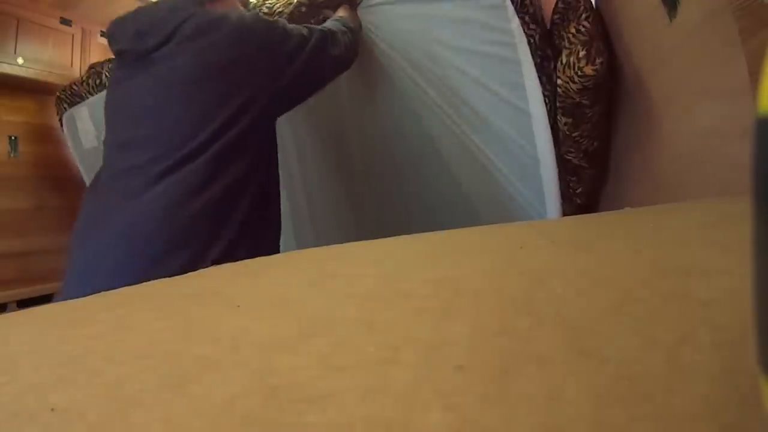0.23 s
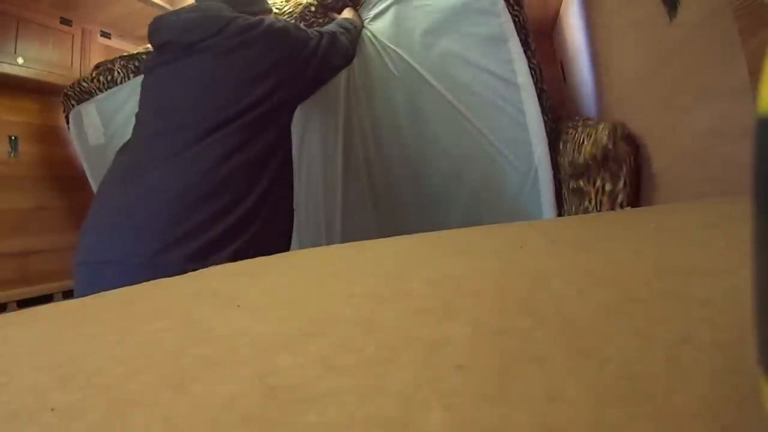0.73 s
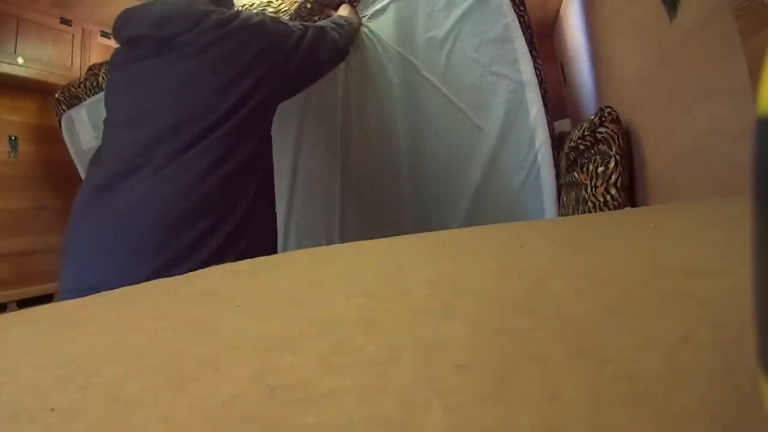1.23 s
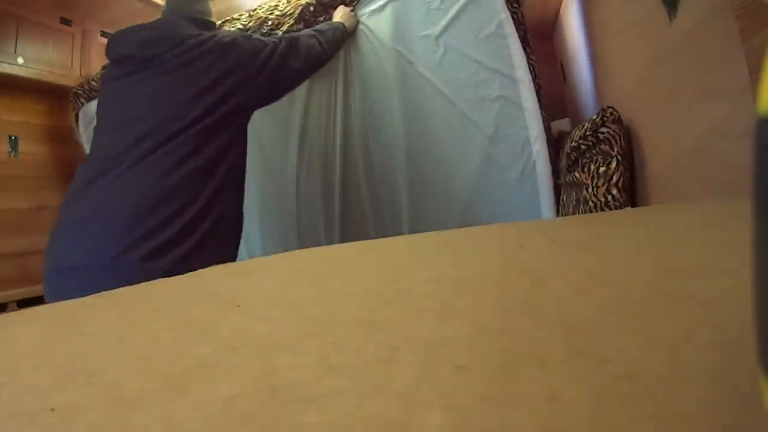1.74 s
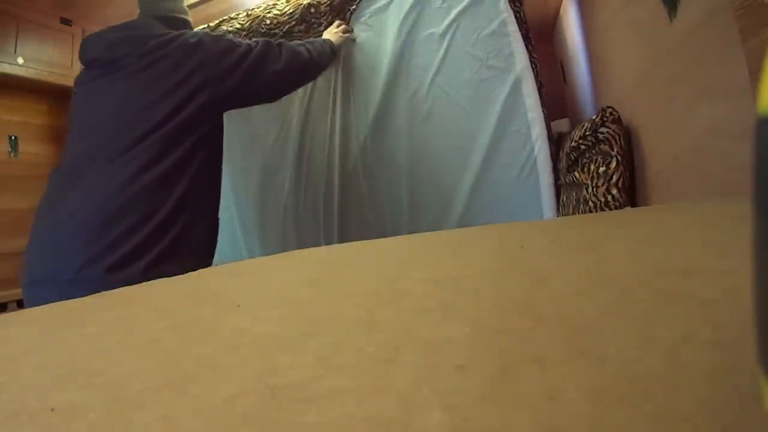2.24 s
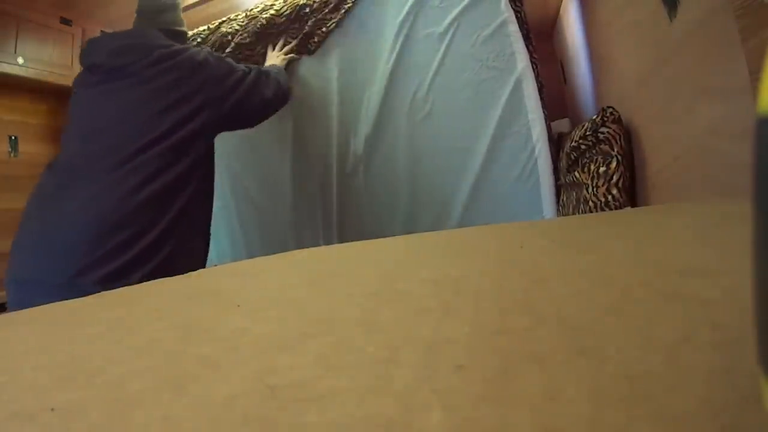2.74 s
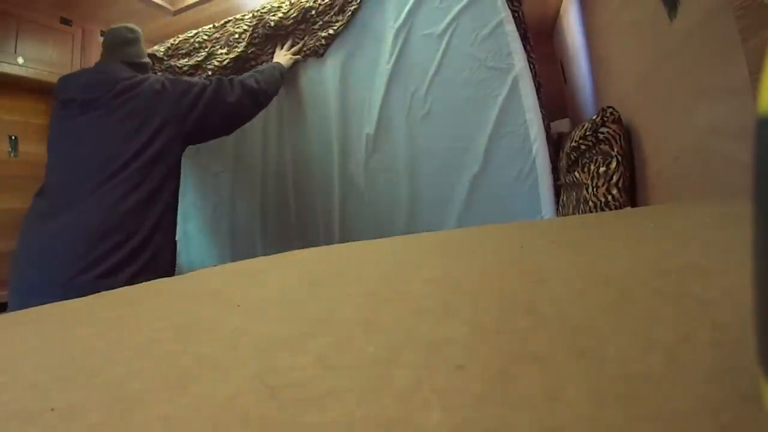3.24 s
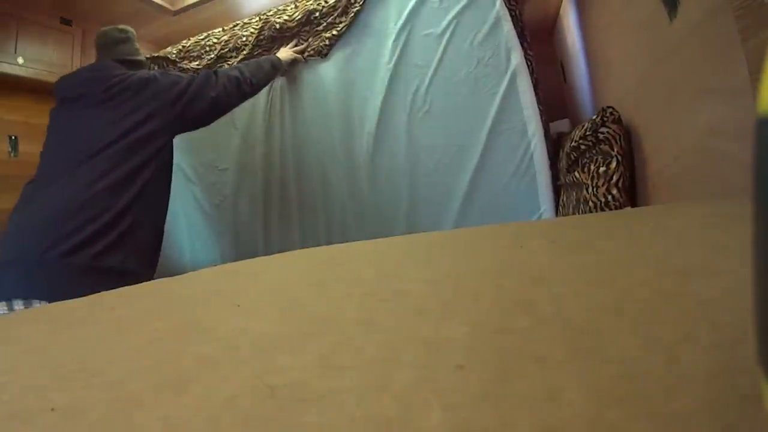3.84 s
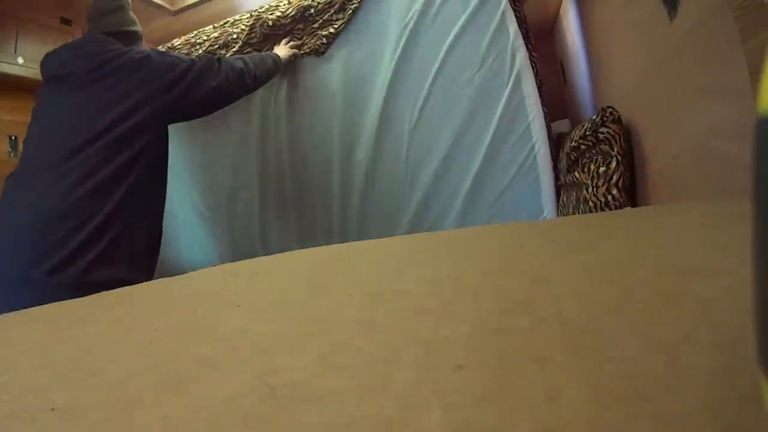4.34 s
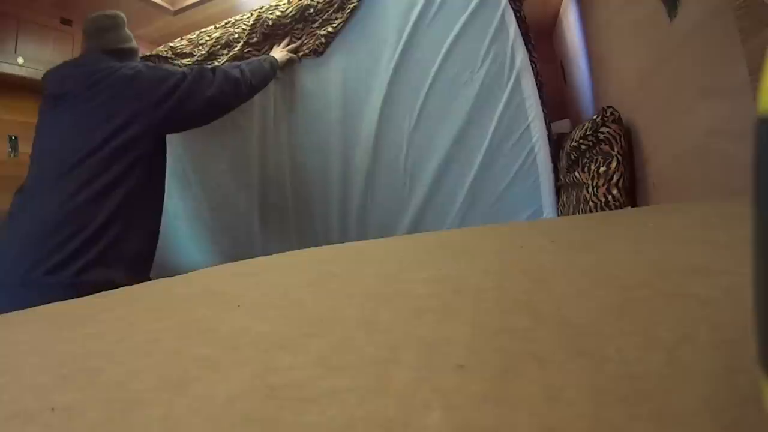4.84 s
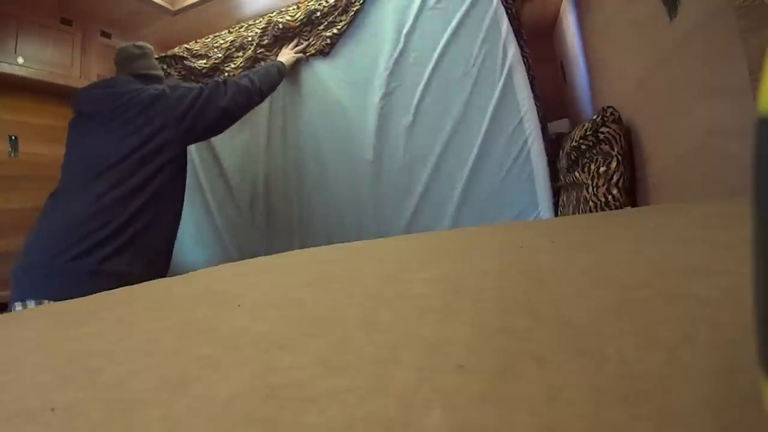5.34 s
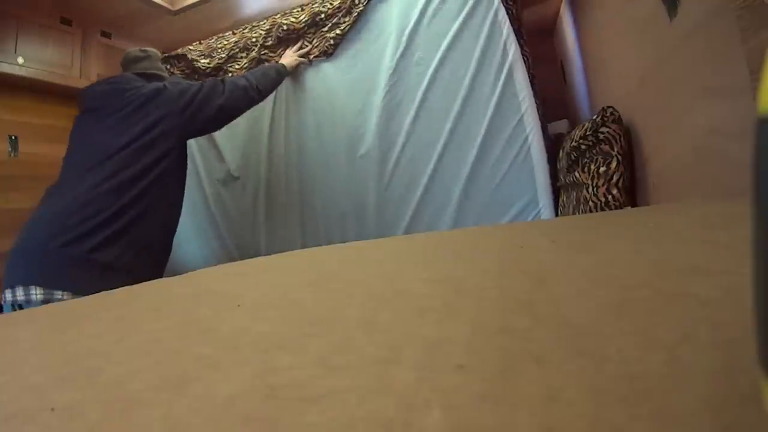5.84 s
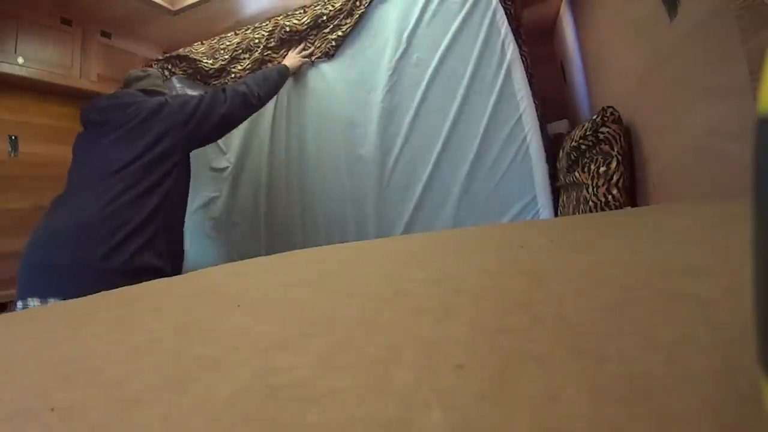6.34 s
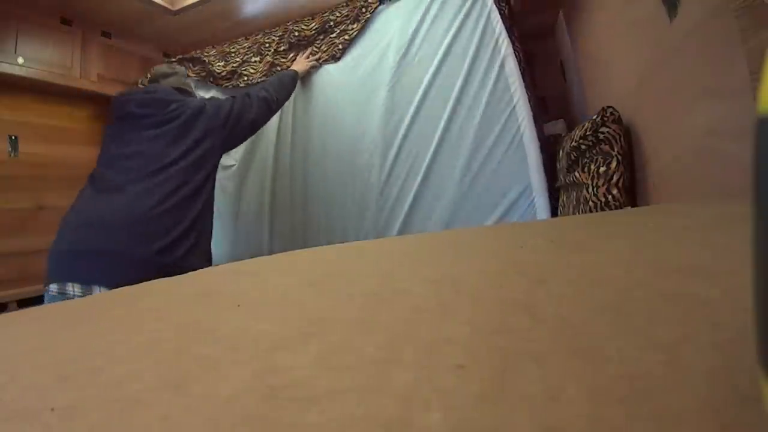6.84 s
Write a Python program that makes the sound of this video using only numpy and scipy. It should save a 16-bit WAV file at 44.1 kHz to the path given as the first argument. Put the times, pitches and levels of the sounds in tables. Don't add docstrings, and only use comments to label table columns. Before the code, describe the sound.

A furnace blower rushes and hums steadily in a small cabin while a sheet is tugged over a mattress, with snaps, thumps and a wooden knock.

```python
import sys
import numpy as np
from scipy import signal
from scipy.fft import rfft, irfft
from scipy.io import wavfile
from scipy.ndimage import uniform_filter1d

SR = 44100
rng = np.random.default_rng(int(sys.argv[2]) if len(sys.argv) > 2 else 0)


def inscribe(sig):
    pcm = np.round(np.clip(np.atleast_2d(sig).T, -1, 1) * 32767)
    wavfile.write(sys.argv[1], SR, pcm.astype(np.int16))


def elevation(decibels):
    levels = np.asarray(decibels, float)
    return 10 ** (levels / 20)


N = 312228


def evened(x):
    return x / np.sqrt(np.mean(x ** 2) + 1e-20)


def read(points, hz):
    f, value = np.transpose(points)
    return np.interp(np.log(hz + 1), np.log(f + 1), value)


def add(mix, start_s, sound):
    part = mix[..., round(start_s * SR):][..., :sound.shape[-1]]
    part += sound[..., :part.shape[-1]]


def drift(rate_hz):
    z = rfft(rng.standard_normal(N))
    hz = np.arange(len(z)) * SR / N
    return evened(irfft(z / (1 + (hz / rate_hz) ** 2), N))


def noise(colour_db, size, patchy_db):
    frames = 4 * N // size + 6
    *parts, patches = rng.standard_normal((frames, size // 2 + 1, 5)).T
    patches = uniform_filter1d(patches, size=size // 100, axis=0)
    patches = evened(uniform_filter1d(patches, size=8, axis=1))
    z = np.array(parts[:2]) + 1j * np.array(parts[2:])
    hz = np.fft.rfftfreq(size, 1 / SR)
    z = z * elevation(colour_db(hz)[:, None] + patchy_db * patches)
    sound = signal.istft(z, nperseg=size, noverlap=3 * size // 4)[1]
    return evened(sound[:, :N])


# freq_hz, density_db
RUSH = [(12, -33), (20, -11.5), (120, -7.5), (169, -4.5), (220, -6), (278, 0), (344, -4.5), (582, -8),
        (719, -6.5), (986, -8), (2230, -19), (4910, -29), (10800, -38), (14100, -66.5), (22000, -120)]
# freq_hz, width_hz, lift_db
DUCTS = [(60, 4.2, -1), (89, 68, 3), (179, 45, 7), (283, 29, 1), (309, 7.2, 7), (422, 44, 8),
         (600, 31, 4.5), (660, 56, 7.5), (721, 38, 11), (716, 14, 7), (856, 10, 13), (913, 9.3, 8.5),
         (1130, 21, 6), (1200, 18, 1.5), (1298, 8.2, 8.5), (1590, 21, -3.5), (2270, 32, 6.5)]
# time_s, pitch_hz, level_db
BLADES = [(0, 284.5, -28.5), (.8, 284, -31), (1.05, 286, -24.5), (1.28, 286, -27.5), (1.5, 285.6, -24),
          (2.0, 284.7, -29.5), (2.6, 283, -33), (3.3, 283.3, -28), (3.9, 286, -24.5), (4.4, 284.6, -29),
          (5.35, 284.5, -28), (5.6, 287.5, -25.5), (5.9, 285.5, -22.5), (6.15, 285.3, -28.5),
          (6.75, 285.5, -24.5), (7.08, 285, -27.5)]


def blower():
    def colour_db(hz):
        lifts = sum(elevation(db) ** 2 / (1 + (2 * (hz - f) / width) ** 2) for f, width, db in DUCTS)
        return read(RUSH, hz) + 10 * np.log10(1 + lifts)

    rush = elevation(-23 + 0.5 * drift(5.3)) * noise(colour_db, size=8192, patchy_db=-0.93)
    time_s, pitch_hz, level_db = np.transpose(BLADES)
    t = np.arange(N) / SR
    pass_hz = np.interp(t, time_s, pitch_hz) + 0.9 * drift(5.1)
    phase = 2 * np.pi * np.cumsum(pass_hz) / SR
    flutter_db = 2 * evened(drift(20) - 0.97 * drift(28))
    hum = elevation(np.interp(t, time_s, level_db) - 2.5 + flutter_db) * np.sin(phase)
    wobble = elevation(-44.5 + drift(2.5)) * np.sin(phase / 7)
    return rush + np.sqrt(2) * (hum + wobble) * [[1], [0]]


def effort_db(moves, rest_db):
    t = np.arange(0, N, 64) / SR
    power = elevation(rest_db) ** 2
    for peak_s, rise_s, fall_s, force_db in moves:
        before = (peak_s - t) / max(rise_s, 0.005)
        after = (t - peak_s) / max(fall_s, 0.005)
        away = np.where(t < peak_s, before, after)
        power = power + elevation(force_db - 8.5 * away ** 2.25) ** 2
    return np.interp(np.arange(N) / SR, t, 10 * np.log10(power))


# freq_hz, density_db
HISS = [(800, -23), (2500, -3), (4000, -1.5), (7500, -6.5), (11000, -6.5)]
# freq_hz, density_db
RUB = [(300, -24), (800, 1), (1500, -0.5), (2300, -3), (4000, -12.5), (8000, -39.5)]
# freq_hz, density_db
RUMBLE = [(40, -5.5), (120, -2), (400, 2.5), (800, -2.5), (1500, -11.5), (3000, -32.5)]
# peak_s, rise_s, fall_s, force_db
STROKES = [(.1, 0.1, 1, -38), (.57, 0.15, 0.14, -33.5), (.7, .06, 0.071, -40), (1.07, 0.12, 0.11, -39),
           (1.23, 0.066, 0.11, -37.5), (1.39, 0.042, 0.041, -37.5), (1.57, 0.14, 0.26, -37.5),
           (1.87, 0.29, 0.11, -36.5), (2.15, 0.17, 0.083, -40), (2.25, 0.027, 0.035, -42),
           (2.45, 0.031, 0.14, -39), (2.56, 0.11, 0.14, -35.5), (2.75, .05, 0.046, -40.5),
           (2.87, 0.044, 0.073, -42), (3.01, 0.06, 0.018, -41), (3.15, 0.019, 0.021, -34),
           (3.36, 0.19, .2, -38), (3.62, .2, 0.091, -36.5), (3.85, 0.061, .25, -43), (4.23, 0.21, 0.5, -40),
           (4.8, 0.048, 0.027, -40.5), (4.95, 0.17, 0.29, -46), (5.38, 0.41, 0.13, -38.5),
           (5.6, 0.19, 0.095, -40), (5.89, 0.049, 0.046, -42), (5.99, 0.06, .04, -40.5),
           (6.11, 0.054, .11, -35), (6.35, 0.098, 0.031, -44), (6.69, 0.24, 0.076, -35.5),
           (6.97, 0.16, 0.49, -40.5)]
# peak_s, half_length_s, weight_db
HEAVES = [(0.303, 0.21, -31.5), (.47, 0.13, -29.5), (0.571, .05, -19), (0.722, 0.087, -23.5),
          (1.198, .3, -37), (1.417, 0.073, -31), (2.012, 0.27, -30.5), (2.448, 0.19, -32),
          (2.982, 0.046, -28), (3.072, 0.01, -24), (3.192, 0.086, -29), (3.52, 0.14, -32.5),
          (3.888, 0.11, -26.5), (4.15, 0.24, -36.5), (4.525, .15, -30.5), (4.725, 0.19, -31),
          (5.353, .2, -30.5), (5.7, 0.46, -37), (6.116, .1, -29), (6.505, 0.14, -28), (6.735, 0.21, -28.5)]


def sheet():
    hiss_db = effort_db(STROKES, rest_db=-52)
    rumble_db = effort_db([(s, half, half, db) for s, half, db in HEAVES], rest_db=-37)
    stroke_rub_db = -34 + 0.82 * (hiss_db + 40)
    heave_rub_db = rumble_db - 10.5
    rub_db = 10 * np.log10(elevation(stroke_rub_db) ** 2 + elevation(heave_rub_db) ** 2)
    slips_db = drift(35)
    slip_rate = uniform_filter1d(rng.exponential(1, N), size=12)
    grit = evened(elevation(2.0 * slip_rate * np.sqrt(12) / 2))
    hiss = noise(lambda hz: read(HISS, hz), size=512, patchy_db=0.7) * grit
    rub = noise(lambda hz: read(RUB, hz), size=512, patchy_db=2.5)
    rumble = noise(lambda hz: read(RUMBLE, hz), size=2048, patchy_db=3.0)
    hiss = hiss * elevation(hiss_db + 5.5 + 0.81 * slips_db)
    rub = rub * elevation(rub_db + 2.5 + 0.86 * slips_db)
    return hiss + rub + rumble * elevation(rumble_db + 3.5)


# start_s, peak_db, pitch_hz, t60_s
THUMPS = [(0.127, -31, 174, 0.096), (0.564, -24.5, 229, 0.15), (0.611, -14, 169, 0.16),
          (0.679, -24, 141.6, 0.14), (0.733, -21.5, 197, 0.21), (2.851, -26, 199, 0.16),
          (3.853, -22, 254, 0.1), (3.954, -30, 165, 0.32), (5.872, -13.5, 155, 0.057),
          (5.909, -17.5, 186, 0.16), (6.108, -28, 212, 0.16), (6.226, -15.5, 154.4, 0.092),
          (6.399, -16.5, 124.3, 0.19), (6.449, -19, 130, 0.18)]


def thumps():
    out, t = np.zeros((2, N)), np.arange(9000) / SR
    for start_s, peak_db, pitch_hz, t60_s in THUMPS:
        swell = np.minimum(t / 0.0048, 1)
        push = elevation(peak_db + 3.5 - 60 * t / t60_s) * swell * np.sin(2 * np.pi * pitch_hz * t)
        add(out[0], start_s, push)
    return out


def puffs(events):
    out, t = np.zeros((2, N)), np.arange(6000) / SR
    hz = np.fft.rfftfreq(len(t), 1 / SR)
    for start_s, peak_db, centre_hz, t60_s in events:
        colour = (hz / (centre_hz + hz ** 2 / centre_hz)) ** 3
        puff = evened(irfft(rfft(rng.standard_normal((2, len(t)))) * colour, len(t)))
        swell = np.minimum(t / (0.05 * t60_s), 1)
        add(out, start_s, elevation(peak_db - 11 - 60 * t / t60_s) * swell * puff)
    return out


# start_s, peak_db, centre_hz, t60_s
SCUFFS = [
    (3.068, -6, 1150, .2),
    (4.465, -13, 1600, .1),
    (.678, -12, 500, .3),
    (.562, -14, 500, .2),
    (6.1, -11, 1300, .3),
]


def scuffs():
    return puffs(SCUFFS)


# start_s, peak_db, pitch_factor
KNOCKS = [
    (5.2693, -5, 1.0),
    (6.118, -13, 1.03),
    (.698, -13, .65),
    (5.66, -20, 1.07),
]
# freq_hz, level_db, t60_s
WOOD = [
    (550, -6, .45),
    (660, 0, .45),
    (800, -14, .25),
    (2030, -18, .15),
]


def knocks():
    out, t = np.zeros((2, N)), np.arange(9000) / SR
    rise_s, damp_s = 0.003, 0.05
    for start_s, peak_db, factor in KNOCKS:
        ring = np.zeros(len(t))
        for freq_hz, level_db, t60_s in WOOD:
            mode = np.cos(2 * np.pi * freq_hz * factor * (t - rise_s))
            ring += elevation(level_db - 60 * t / t60_s) * mode
        swell = np.minimum(t / rise_s, 1) ** 1.5
        add(out[0], start_s, elevation(peak_db - 2.2 - 20 * (t / damp_s) ** 4) * swell * ring)
    return out


# start_s, peak_db, centre_hz, t60_s
SNAPS = [(1.412, -15, 1680, 0.06), (2.0731, -22, 2240, 0.07), (2.132, -8, 1430, 0.062),
         (2.2404, -12, 1290, 0.057), (2.395, -9, 1240, 0.054), (2.4294, -11, 1120, 0.077),
         (2.474, -12, 1990, 0.25), (2.5507, -6, 1700, 0.044), (2.5862, -20, 2070, 0.046),
         (2.99, -15, 1200, 0.07), (3.0734, -19, 1120, 0.07), (3.142, -13, 1400, 0.088),
         (3.1984, -18, 1130, 0.07), (3.2226, -12, 1400, 0.063), (3.2568, -10.5, 1190, 0.055),
         (3.9984, -23, 1710, 0.07), (4.209, -13, 1000, 0.076), (4.4682, -11, 1593, 0.064),
         (4.7997, -21, 1140, 0.099), (5.1483, -23, 1062, 0.07), (5.79, -14, 1160, 0.073),
         (6.3514, -12, 1040, 0.058), (7.0471, -12, 1000, 0.048)]


def snaps():
    return puffs(SNAPS)


# freq_hz, likeness_0_to_1
LIKENESS = [(30, .97), (400, .95), (1000, .91), (1700, .7), (2600, .52), (5000, .56), (11000, .82)]
# freq_hz, lead_rad
LEAD = [(30, -.15), (110, -.4), (200, -.7), (280, -1.15), (600, -1.35), (1200, -1.45), (1600, -1.1),
        (2400, 0), (10000, .15)]
# freq_hz, tilt_db
TILT = [(60, 0.5), (110, -0.5), (190, -0.5), (330, -2), (590, -2.5), (1050, -3.5), (1860, -7), (3300, -3),
        (5850, -1.5), (10400, -0.5)]


def scene():
    shared, apart = rfft(blower() + sheet() + thumps() + scuffs() + knocks() + snaps())
    hz = np.fft.rfftfreq(N, 1 / SR)
    same = np.clip(read(LIKENESS, hz), 0, 1)
    left = same * shared * np.exp(1j * read(LEAD, hz)) + np.sqrt(1 - same ** 2) * apart
    half_tilt_db = read(TILT, hz) / 2
    return irfft([left * elevation(half_tilt_db), shared * elevation(-half_tilt_db)], N)


def roll_off(x):
    return signal.sosfilt(signal.butter(12, 16300, fs=SR, output="sos"), x)


# start_s, end_s
GAPS = [
    (2.61698, 2.74494),
    (5.39030, 5.51828),
]


def record(dry):
    lowpass = signal.firwin(2001, 11020, window=("kaiser", 9), fs=SR)
    out = signal.oaconvolve(dry, lowpass[None], "same")
    out = signal.sosfilt(signal.butter(3, 36, "high", fs=SR, output="sos"), out)
    t = np.arange(N) / SR
    for start_s, end_s in GAPS:
        out = out * ((t < start_s) | (t >= end_s))
    return roll_off(out)


dry = scene()
out = record(dry)
inscribe(out)
```